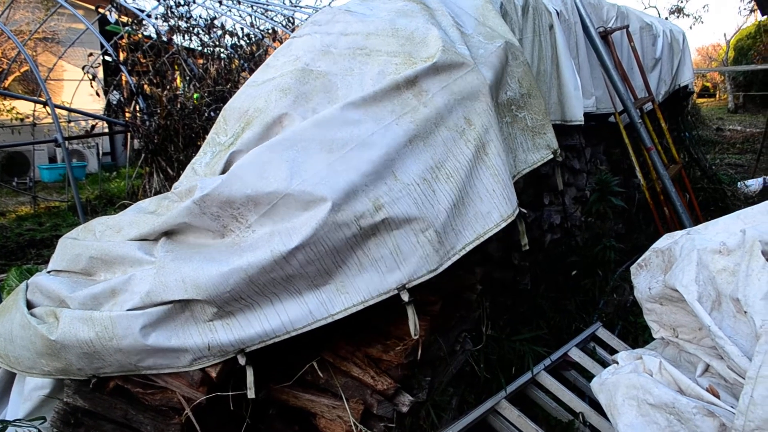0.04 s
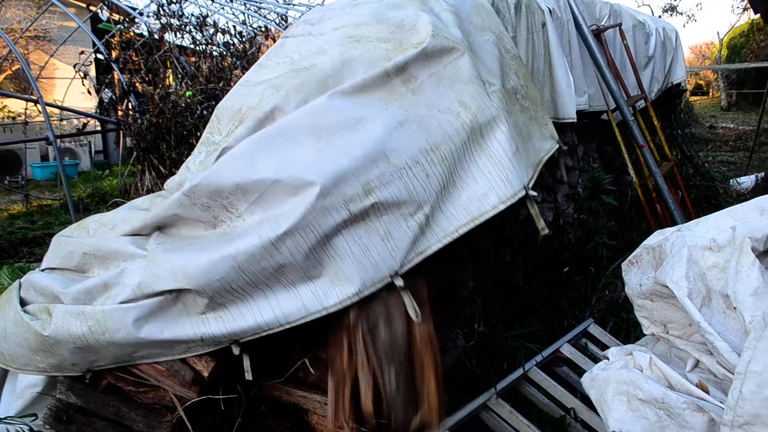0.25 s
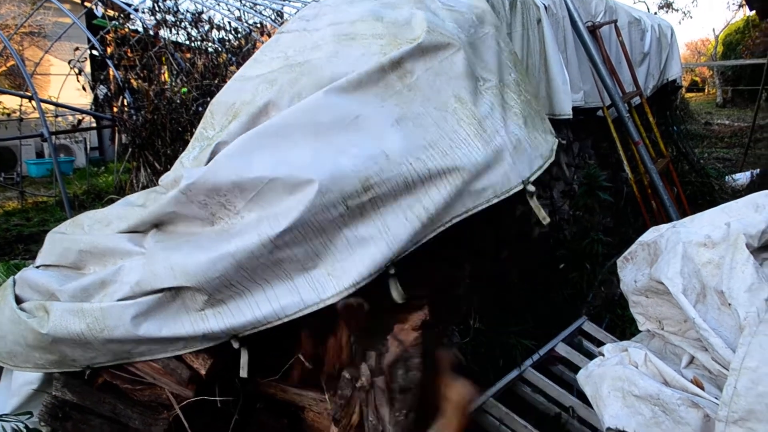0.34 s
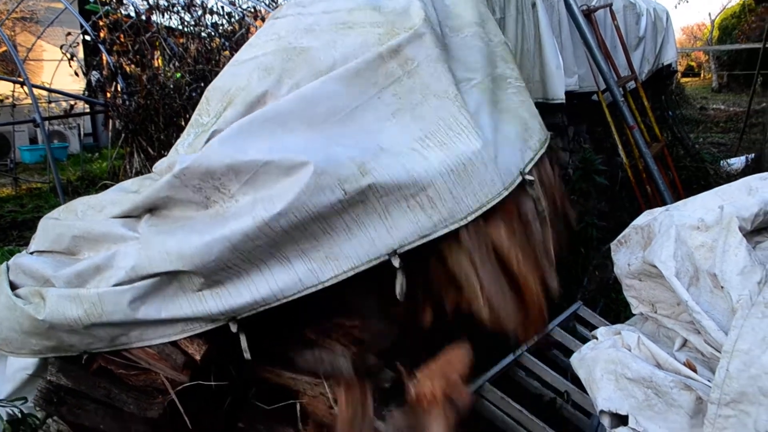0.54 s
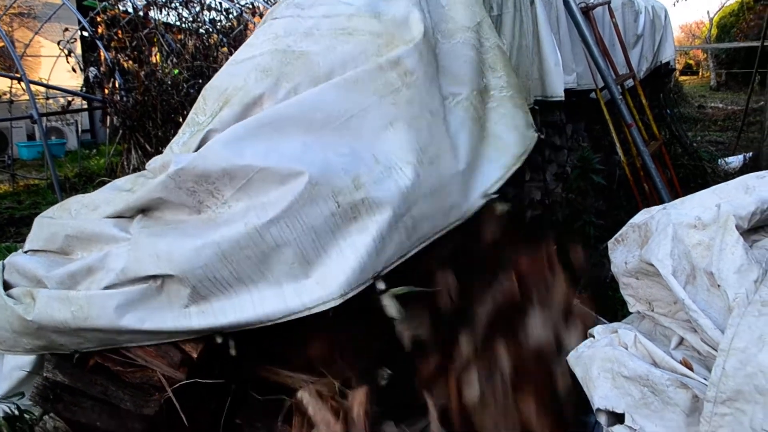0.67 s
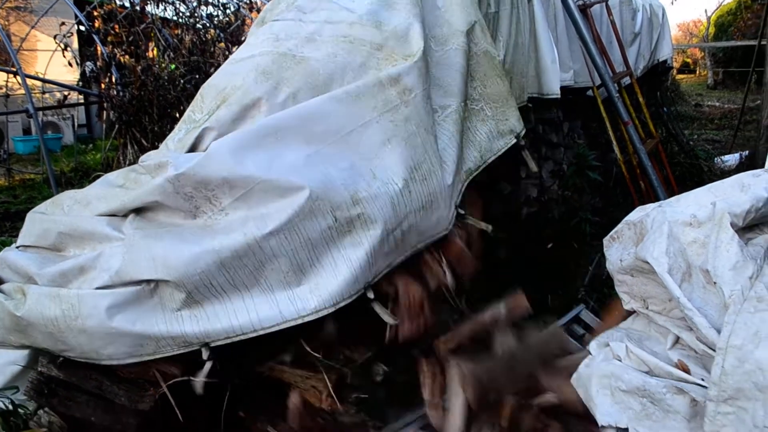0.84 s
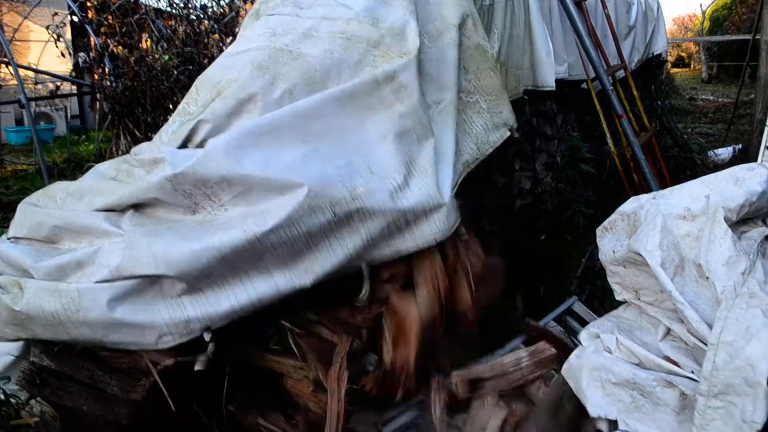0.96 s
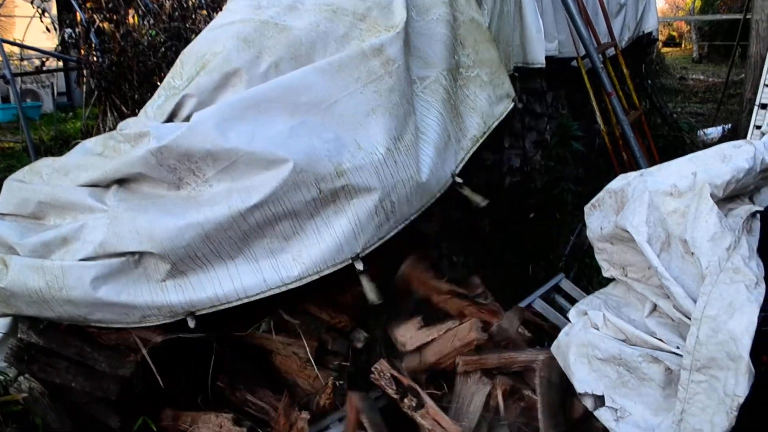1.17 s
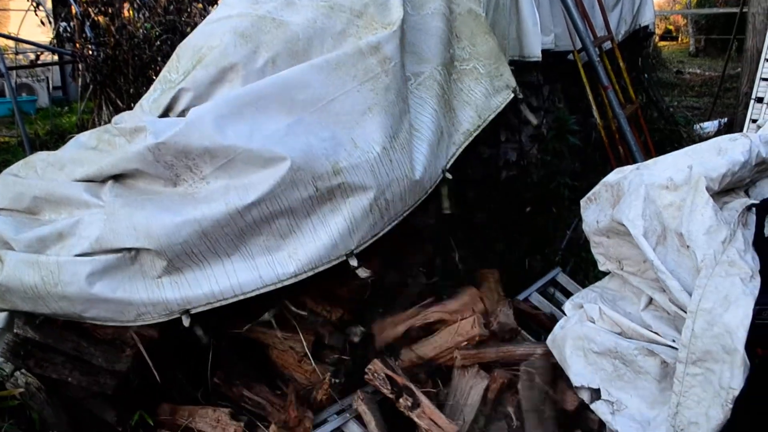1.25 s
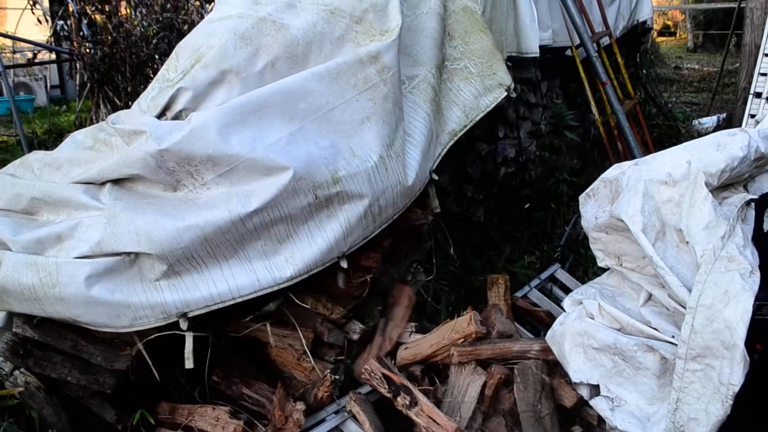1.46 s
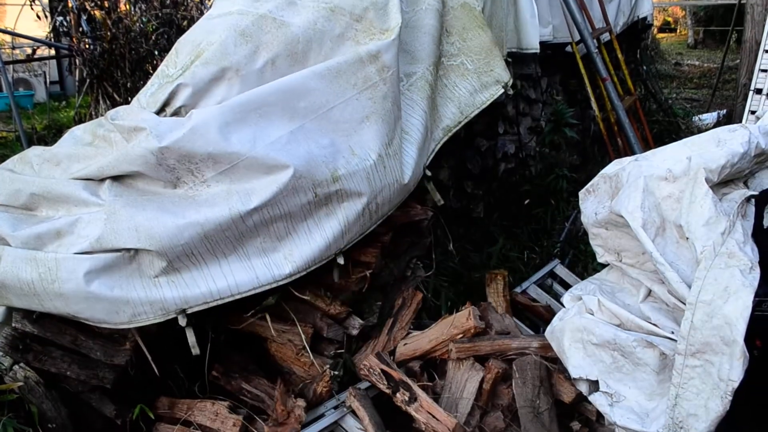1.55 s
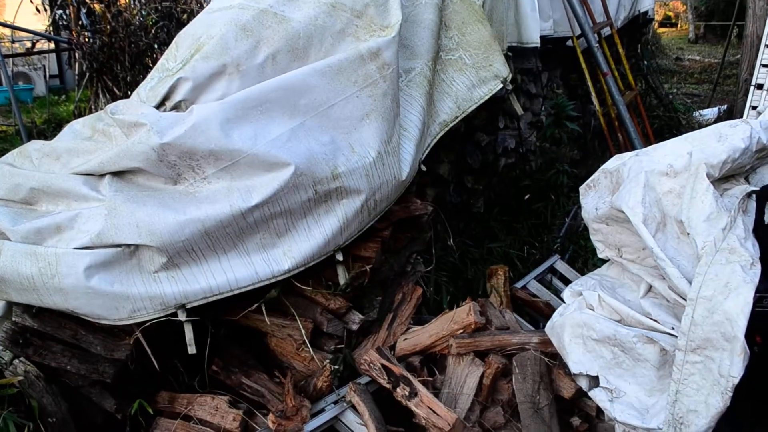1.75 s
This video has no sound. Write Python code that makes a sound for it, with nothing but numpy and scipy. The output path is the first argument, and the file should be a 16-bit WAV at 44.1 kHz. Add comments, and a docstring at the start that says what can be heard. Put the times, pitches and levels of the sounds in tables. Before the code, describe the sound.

Split firewood tumbles from a stack in a dense, knocking clatter outdoors.

```python
"""Firewood stack giving way

Split logs slide under a tarp, outdoors, a few steps away. One lands with a sharp crack and the rest
tumble in a dense clatter, each knock a blend of crack, woody ring, thud and splintering bark.
Hollow scrapes, small taps and crumbling bark fill the gaps; two last logs drop and the pile settles.
Short echoes off the stack and the sheds sit around it all, over a bed of quiet air."""
import sys
import numpy as np
from scipy import signal
from scipy.io import wavfile

SR = 44100
rng = np.random.default_rng(int(sys.argv[2]) if len(sys.argv) > 2 else 0)


def put_to_file(sound):
    """Save the sound as 16-bit audio at rate SR, in the file named by the first command-line argument."""
    columns = np.atleast_2d(sound).T  # one column per channel
    safe = np.clip(columns, -1, 1)
    whole_steps = np.round(safe * 32767)
    wavfile.write(sys.argv[1], SR, whole_steps.astype(np.int16))


N = 79380

# The outdoor bed. Each row: frequency in Hz, relative level in dB.
AIR_COLOUR = [(25, -11), (100, 1), (270, 5), (600, 7), (1600, 1.5), (4000, -16), (10000, -28), (12000, -50),
              (16000, -60)]
# Echo tails of the yard. Each row: frequency in Hz, time to fall 60 dB in seconds.
YARD_DECAY = [(200, 0.26), (600, 0.15), (1800, 0.21), (4500, .18), (10000, 0.15)]

# Fader rides for crumbling, dragging and jostling. Each row: time in seconds, level in dB.
BARK_RIDE = [(0, -50.5), (.17, -50.5), (.22, -40.5), (.31, -46.5), (.37, -35), (.53, -38.5), (.74, -29.5),
             (.87, -37.5), (.96, -33), (1.02, -37.5), (1.14, -32.5), (1.22, -41.5), (1.31, -59),
             (1.38, -36.5), (1.44, -81), (1.48, -49), (1.53, -58), (1.6, -67.5), (1.8, -72.5)]
DRAG_RIDE = [(0, -39), (.05, -35), (.1, -39), (.14, -36.5), (.26, -37), (.4, -43), (.55, -36), (.95, -43.5),
             (1.2, -41), (1.3, -48), (1.45, -54), (1.6, -74)]
JOSTLE_RIDE = [(0, -39.5), (.05, -39), (.17, -39.5), (.22, -31.5), (.32, -37), (.37, -25), (.43, -24),
               (.55, -29), (.62, -27), (.8, -23.5), (.87, -25), (1.02, -26.5), (1.15, -20), (1.22, -33),
               (1.3, -42), (1.39, -26.5), (1.45, -53), (1.55, -42), (1.62, -63), (1.8, -63)]
# Tone of each kind of contact. Each row: frequency in Hz, relative level in dB.
SPLINTER_COLOUR = [(30, -74), (1500, -17.5), (3600, -5), (4700, 3.5), (6200, -5), (7400, -7), (7950, -14.5),
                   (8700, -9.5), (10500, -18), (12000, -36.5), (16000, -21)]
DRAG_COLOUR = [(25, -31), (100, -26), (200, -13.5), (300, -6), (420, -11.5), (540, -1), (700, 1),
               (950, -6.5), (1250, -0.5), (2000, -2.5), (4000, -34.5), (16000, -83)]
JOSTLE_COLOUR = [(25, -46), (100, -24), (200, -13.5), (300, -4.5), (420, -12.5), (620, 2.5), (1000, 1),
                 (1700, 3.5), (2500, 1), (3600, -6.5), (4800, -16), (8000, -27.5), (10500, -37),
                 (12000, -52), (16000, -76)]
THUD_COLOUR = [(25, -37), (80, -20), (150, -15.5), (270, 3), (400, -2.5), (550, 9), (900, 0.5), (2000, -30),
               (16000, -63)]
CRACK_COLOUR = [(30, -40), (150, -41.5), (400, -21), (650, -8), (1100, -2), (1700, 1), (2400, 3.5),
                (3600, -8.5), (5000, -20.5), (8000, -42), (16000, -88)]

# Logs bouncing free. Each row: start in seconds, level in dB, pitch in Hz, time to fall 60 dB in seconds.
CLEAR_NOTES = [(0.287, -15.5, 630, 0.035), (0.290, -15.5, 975, 0.02), (0.331, -9.5, 799, 0.035),
               (0.337, -23, 2120, 0.35), (0.617, -12.5, 1589, 0.075), (0.376, -16, 1877, .12),
               (0.574, -14.5, 1697, .06), (0.663, -15, 1935, 0.11), (0.722, -13, 531, 0.048),
               (0.739, -19, 1825, 0.12), (0.756, -15, 2137, 0.14), (0.773, -18, 1577, 0.21),
               (1.058, -18, 2070, 0.078), (1.129, -14, 570, 0.03), (1.279, -17, 920, 0.027),
               (1.316, -14, 2454, 0.13), (1.321, -18.5, 1567, 0.086), (1.334, -24.5, 510, 0.07),
               (1.502, -30.5, 604, 0.11), (1.504, -30, 943, 0.083), (1.511, -27, 2805, .08)]
# Modes of a split log. Each row: multiple of the log's pitch, relative level in dB.
LOG_MODES = [(.36, -13), (.52, -18), (.73, -6.5), (1, 3), (1.13, -3), (1.34, -4), (1.62, -10.5),
             (2.25, -12), (2.7, -20)]
# Log hitting log. Each row: start in seconds, strength in dB, pitch in Hz, thud trim in dB,
# splinter trim in dB, time for the faces to crush in seconds.
LOG_HITS = [(0.205, -17, 2040, -8, -16, 0.0036), (0.220, -31, 1930, -8, -14, .003),
            (0.287, -11.5, 1237, -18, -20.5, 0.00021), (0.329, 3, 1513, -15, -15.5, 0.00081),
            (0.335, -7, 1730, -24, -9, 0.0012), (0.342, -14, 1910, -30, -12, 0.0018),
            (0.352, -5.5, 2230, -28, -19, .002), (0.362, -5.5, 1870, -32, -21, 0.0018),
            (0.376, -3.5, 1948, -28.5, -18, 0.0026), (0.388, -7, 2147, -40, -19.5, 0.0024),
            (0.442, -6, 2104, -18.5, -21, 0.0035), (0.461, -9, 2450, -32, -39, 0.0022),
            (0.477, -18, 2050, -30, -11.5, 0.0033), (0.568, -5, 2170, -33, -12.5, 0.0036),
            (0.573, 1, 2270, -20.5, -17, 0.0031), (0.599, -4.5, 1613, -32, -16, 0.0072),
            (0.616, -1, 1880, -39, -22, 0.00085), (0.631, -4, 1850, -20.5, -17, .003),
            (0.648, -9.5, 1945, -22, -14, 0.0022), (0.663, -8.5, 1960, -25, -19, .002),
            (0.697, -6.5, 1620, -27, -34, .002), (0.712, -4, 1960, -16, -12.5, 0.0015),
            (0.720, -5, 2320, -6, -13.5, 0.0011), (0.728, -2, 1807, -35, -16.5, 0.0026),
            (0.739, -3.5, 1940, -37, -12.5, .002), (0.755, -4.5, 2120, -28, -18, 0.005),
            (0.772, -1.5, 1592, -27, -18.5, 0.0014), (0.801, -1.5, 2160, -23, -17.5, 0.0018),
            (0.821, -6, 2145, -24, -16.5, 0.0025), (0.831, -9, 1820, -23, -21, 0.0018),
            (0.896, -9, 1527, -12, -20, 0.0026), (0.910, -4.5, 1657, -28, -18.5, 0.0018),
            (0.920, -8.5, 1760, -22, -24, 0.0037), (0.948, -8.5, 1833, -10.5, -20, .003),
            (0.958, -11.5, 1634, -13, -16, 0.0029), (0.973, -5, 2070, -21, -19.5, .001),
            (0.989, -18, 2160, -24, -20, .003), (1.036, -5.5, 1483, -28, -15, 0.0007),
            (1.042, -3.5, 1605, -16, -14.5, 0.0024), (1.056, -3.5, 2370, -24, -14.5, .001),
            (1.064, -7.5, 1567, -15, -26, 0.0027), (1.101, -4, 1278, -27, -17, 0.0011),
            (1.110, -8, 2570, -12.5, -19, 0.0012), (1.128, -8, 1573, -21, -17.5, .002),
            (1.145, -9, 1870, -20, -15, 0.0027), (1.161, -8, 2064, -20, -17, 0.0017),
            (1.174, -17, 2310, -21, -17, .002), (1.198, -22, 1490, -6, -17, 0.0027),
            (1.240, -12.5, 1604, -15, -18, 0.005), (1.266, -17, 1585, -9, -13, .003),
            (1.280, -24.5, 2090, -13, -26, .002), (1.316, -11.5, 2436, -13, -18, 0.00049),
            (1.321, -9, 2427, -8.5, -20, 0.0028), (1.337, -9.5, 1616, -12, -21, 0.0026),
            (1.367, -13.5, 2063, -27, -17.5, 0.0043), (1.388, -10.5, 1900, -32, -17, 0.0018),
            (1.401, -25, 2160, -3, -36, .002), (1.462, -27.5, 2530, -11.5, -10.5, 0.0027),
            (1.502, -15.5, 1350, -8, -23, 0.00073), (1.511, -12, 1624, -16.5, -18, 0.0046),
            (1.563, -30, 2760, -15, -21, .002), (1.69, -46.5, 1640, -4, -11.5, .003),
            (1.738, -43, 1675, -8, -16, .003)]


def amp(db):
    """Decibels to gain."""
    return 10 ** (np.asarray(db) / 20)


def unit_rms(x):
    """Scales to an rms of 1."""
    return x / np.sqrt(np.mean(x ** 2) + 1e-20)


def curve_at(points, hz):
    """Reads a table on a log-frequency axis."""
    f, value = np.transpose(points)
    return np.interp(np.log(hz + 1), np.log(f + 1), value)


def ride(points):
    """Gain over time from a fader ride."""
    return amp(np.interp(np.arange(N) / SR, *np.transpose(points)))


def add(mix, start_s, sound):
    """Drops a sound into the mix."""
    part = mix[max(round(start_s * SR), 0):][:len(sound)]
    part += sound[:len(part)]


def colour(x, points, size=4096):
    """Minimum-phase EQ, so attacks stay crisp; the result has an rms of 1."""
    log_gain = np.log(amp(curve_at(points, abs(np.fft.fftfreq(size, 1 / SR)))))
    taps = np.fft.ifft(np.exp(np.conj(signal.hilbert(log_gain)))).real[:size // 2]
    return unit_rms(signal.fftconvolve(x, taps / np.linalg.norm(taps))[:len(x)])


def fade(t, t60):
    """Falls by 60 dB in t60 seconds."""
    return np.exp(-np.log(1000) * t / t60)


def clicks(per_s, spread_db):
    """Random clicks of uneven size."""
    size = amp(spread_db * np.minimum(rng.exponential(1, N), 4))
    return size * rng.choice([-1, 1], N) * (rng.random(N) < per_s / SR)


def air():
    """A soft, steady bed of outdoor noise."""
    return amp(-61) * colour(rng.standard_normal(N), AIR_COLOUR)


def echoes(predelay_s=0.004, density=1 / 12):
    """One pattern of short scattered echoes, each band dying at its own speed."""
    n = SR // 2
    taps = rng.choice([-1., 1.], n) * (rng.random(n) < density) * (np.arange(n) > predelay_s * SR)
    hz, t, bands = signal.stft(taps, SR, nperseg=256)
    bands = bands * fade(t, curve_at(YARD_DECAY, hz)[:, None])
    tail = signal.istft(bands, SR, nperseg=256)[1]
    return tail / np.linalg.norm(tail)


def yard(wood, patterns=9, crossfade_s=0.017):
    """Logs land in ever new spots, so the send crossfades round a set of echo patterns."""
    spot = np.arange(N) / SR / crossfade_s
    sends = [np.sin(np.pi / 2 * np.minimum((spot - k) % patterns, 2)) for k in range(patterns)]
    return sum(signal.fftconvolve(wood * send, echoes())[:N] for send in sends)


def bark():
    """Fine, bright crackle of bark scraping and breaking off."""
    return ride(BARK_RIDE) * colour(clicks(per_s=1200, spread_db=0.5), SPLINTER_COLOUR)


def drag():
    """A hollow scrape: rough faces stick and slip, sounding the low modes of the logs."""
    return ride(DRAG_RIDE) * colour(clicks(per_s=800, spread_db=2), DRAG_COLOUR)


def jostle(variants=120, longest_t60=0.042):
    """A swarm of small taps between sliding logs, each a short puff of wood-toned noise."""
    t, out = np.arange(SR // 16) / SR, np.zeros(N)
    taps = rng.standard_normal((variants, len(t)))
    taps *= fade(t, longest_t60 * rng.uniform(0.29, 1, (variants, 1)))
    hits = clicks(per_s=1300, spread_db=3)
    which = rng.integers(0, variants, N)
    for i in np.flatnonzero(hits):
        add(out, i / SR, hits[i] * unit_rms(taps[which[i]]))
    return ride(JOSTLE_RIDE) * colour(out, JOSTLE_COLOUR)


def burst(t, attack, points, t60):
    """Coloured noise that swells as the faces crush together, then dies; t60 sets its energy."""
    decay = fade(t, t60)
    noise = rng.standard_normal(len(t)) * attack * decay
    return colour(noise, points) * np.sqrt(np.mean(decay ** 2))


def log_ring(t, hz, t60=0.08, scatter=0.0723):
    """One log's modes, the high ones dying sooner; no two logs split alike, so the side modes scatter."""
    out = np.zeros(len(t))
    for ratio, db in LOG_MODES:
        detune, polarity = rng.uniform(-1, 1, 2)
        mode_hz = hz if ratio == 1 else hz * ratio * (1 + scatter * detune)
        decay = fade(t, t60 / max(ratio, 1))
        out += np.sign(polarity) * amp(db) * decay * np.sin(2 * np.pi * mode_hz * t)
    return out


def knock(db, hz, thud_db, splinter_db, crush_s, rebounds_per_s=220, rebound_fade_s=0.012):
    """Rough faces meet and chatter: a woody ring, a crack, a low thud and splintering bark."""
    t = np.arange(SR // 5) / SR
    attack = 1 - np.exp(-t / crush_s)
    contacts = amp(-8) * rng.standard_normal(len(t)) * np.exp(-t / rebound_fade_s)
    contacts *= rng.random(len(t)) < rebounds_per_s / SR
    contacts[0] = 1  # the first hit, ahead of its rebounds
    modes = log_ring(t, hz)
    chatter = signal.fftconvolve(modes, contacts)[:len(t)] * attack
    ring = amp(-17.5) * unit_rms(chatter) * modes.std()
    crack = amp(-7.5) * burst(t, attack, CRACK_COLOUR, t60=0.036)
    thud = amp(thud_db - 4.5) * burst(t, attack, THUD_COLOUR, t60=0.045)
    splinter = amp(splinter_db) * burst(t, attack, SPLINTER_COLOUR, t60=0.045)
    return amp(db) * (ring + crack + thud + splinter)


def falling_logs(note_rise_s=0.00034):
    """The lead clatter: log knocks on log, and those that bounce free sing one clear note."""
    out, t = np.zeros(N), np.arange(SR // 5) / SR
    for start_s, *hit in LOG_HITS:
        add(out, start_s, knock(*hit))
    attack = 1 - np.exp(-t / note_rise_s)
    for start_s, db, hz, t60 in CLEAR_NOTES:
        add(out, start_s, amp(db) * attack * fade(t, t60) * np.sin(2 * np.pi * hz * t))
    return out


def scene():
    """The mono mix: wood up front, air and yard echoes behind."""
    wood = falling_logs() + jostle() + drag() + bark()
    return (wood + air() + amp(-5.5) * yard(wood))[None]


def record(dry, low_hz=80.4, top_hz=11560, ceiling=0.81, knee=12):
    """A small microphone dulls the top, overloads on the loudest cracks and thins the bass."""
    dulled = signal.sosfilt(signal.butter(12, top_hz, fs=SR, output="sos"), dry)
    clipped = dulled / (1 + abs(dulled / ceiling) ** knee) ** (1 / knee)
    fizz_filter = signal.firwin(9, 11700, fs=SR)[None]  # softens only the distortion
    overloaded = dulled - signal.oaconvolve(dulled - clipped, fizz_filter, "same")
    thinned = signal.sosfilt(signal.butter(1, low_hz, "high", fs=SR, output="sos"), overloaded)
    band_limit = signal.firwin(511, 15800, window=("kaiser", 9), fs=SR)[None]
    return signal.oaconvolve(thinned, band_limit, "same")


dry = scene()
out = record(dry)
put_to_file(out)
```